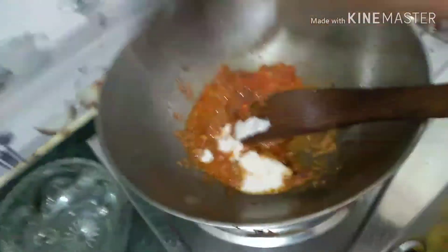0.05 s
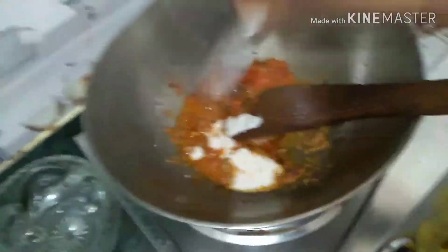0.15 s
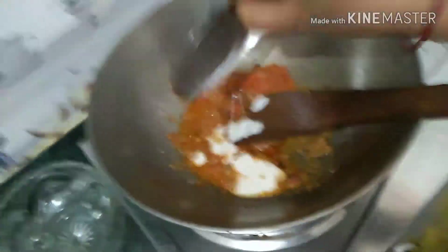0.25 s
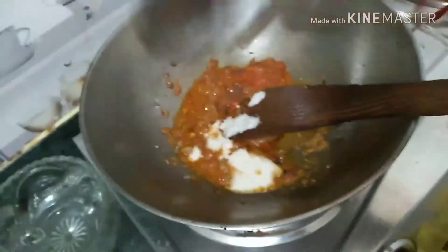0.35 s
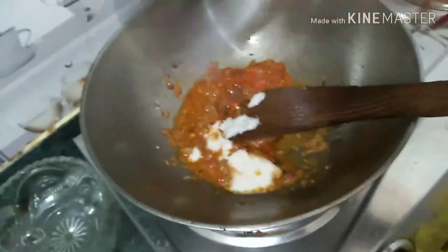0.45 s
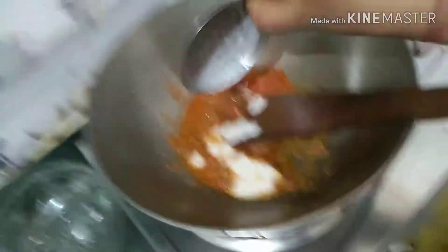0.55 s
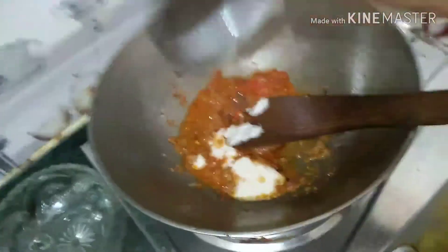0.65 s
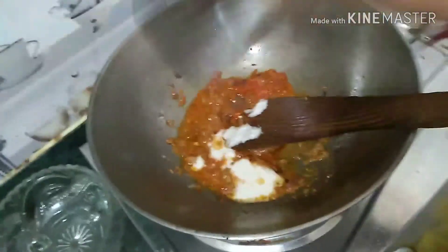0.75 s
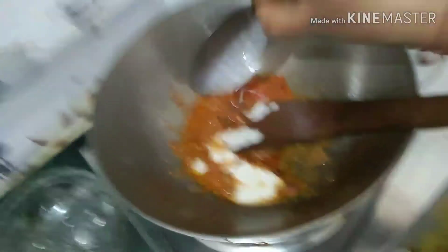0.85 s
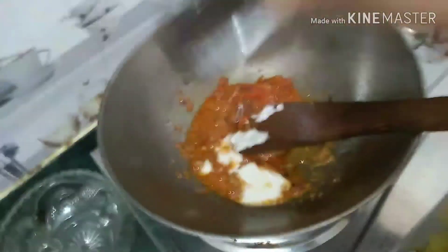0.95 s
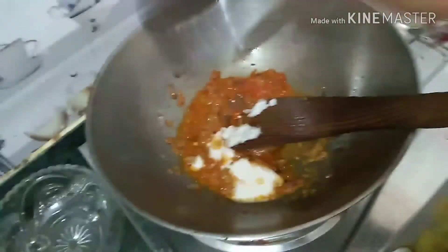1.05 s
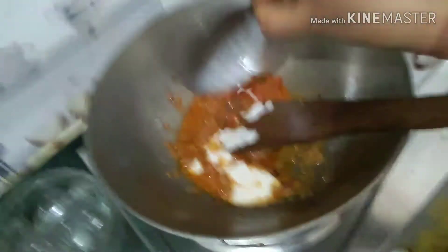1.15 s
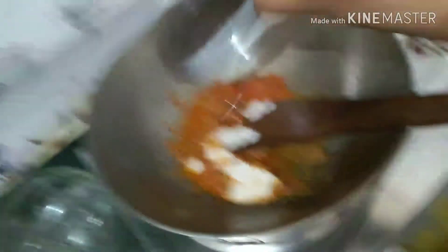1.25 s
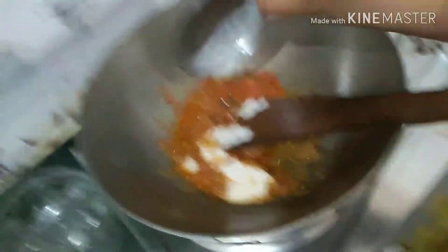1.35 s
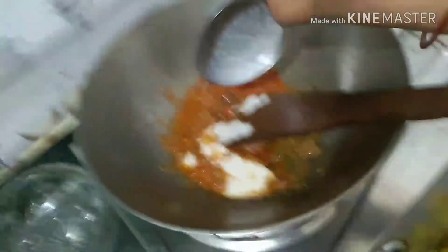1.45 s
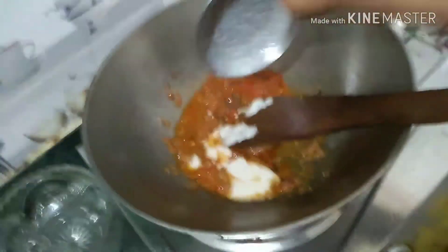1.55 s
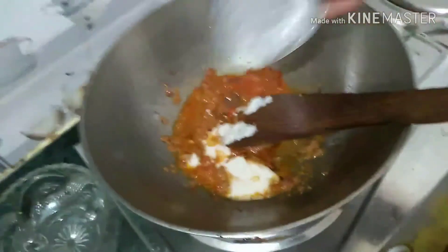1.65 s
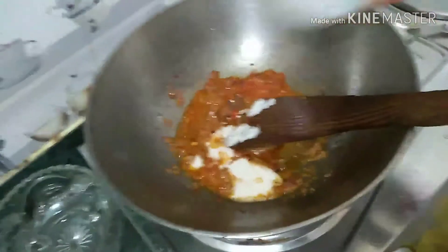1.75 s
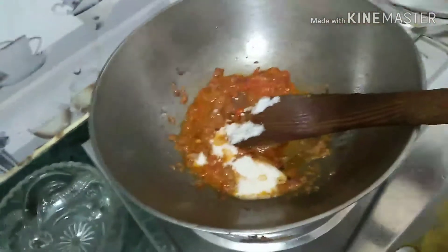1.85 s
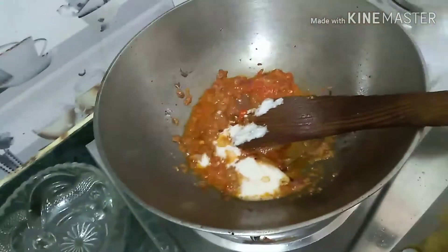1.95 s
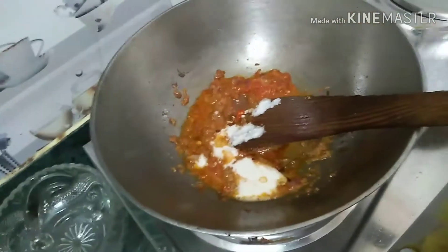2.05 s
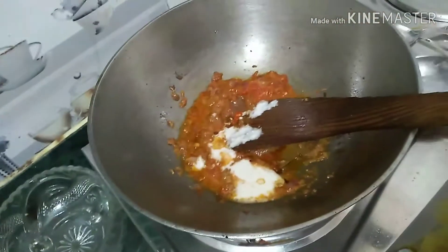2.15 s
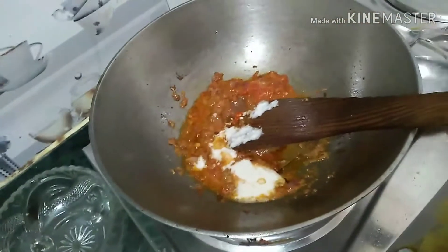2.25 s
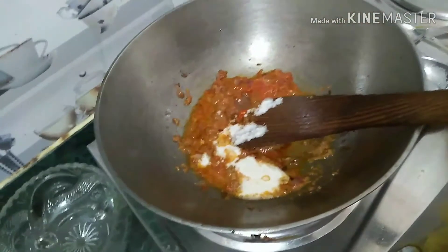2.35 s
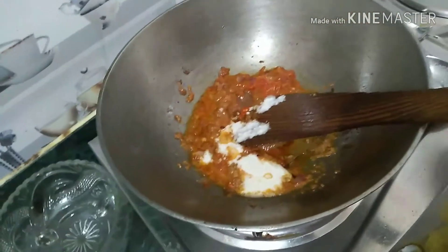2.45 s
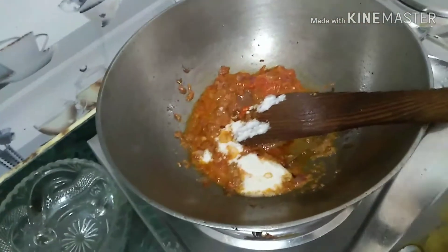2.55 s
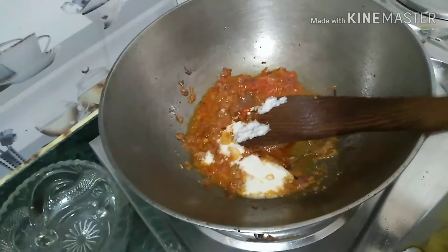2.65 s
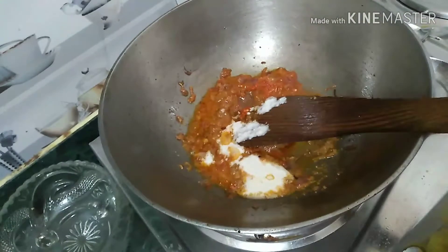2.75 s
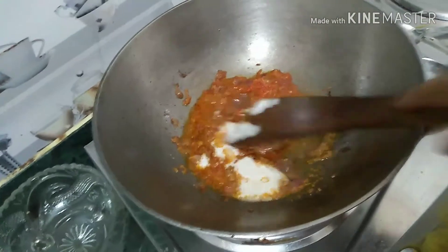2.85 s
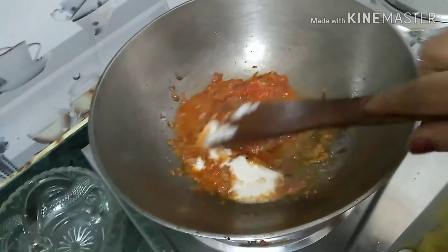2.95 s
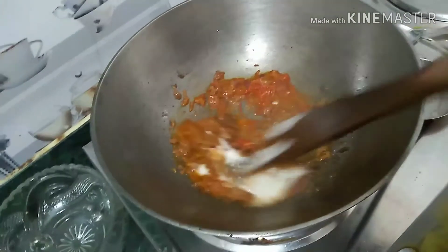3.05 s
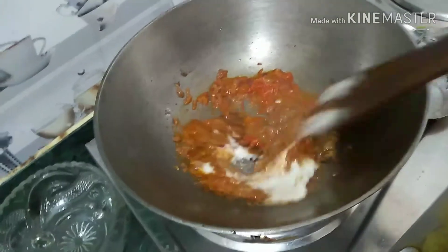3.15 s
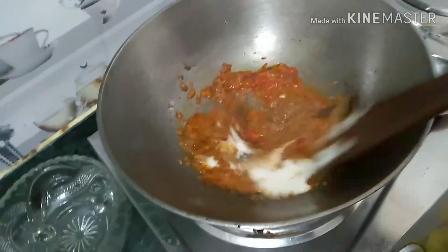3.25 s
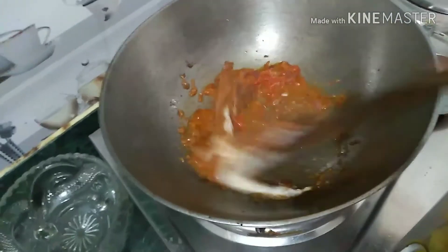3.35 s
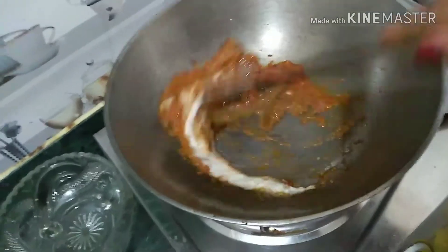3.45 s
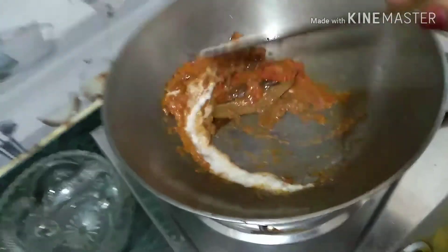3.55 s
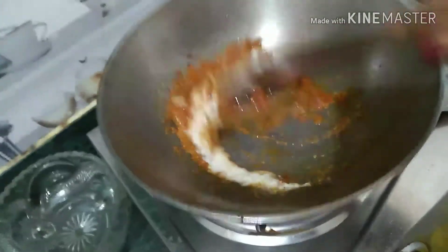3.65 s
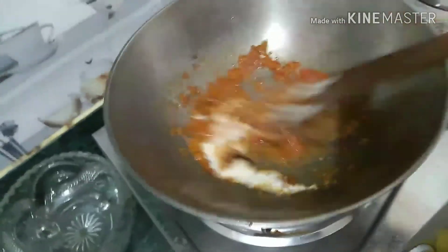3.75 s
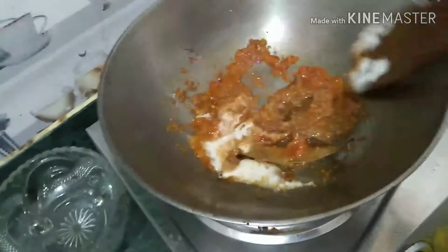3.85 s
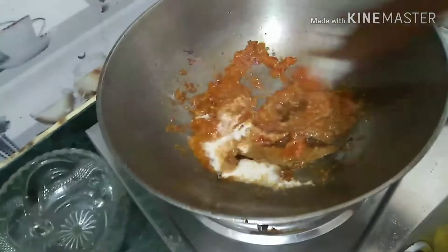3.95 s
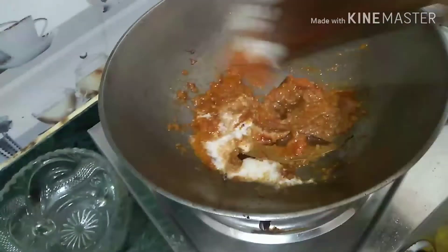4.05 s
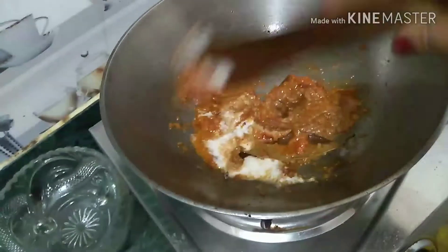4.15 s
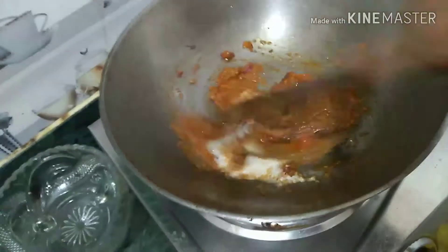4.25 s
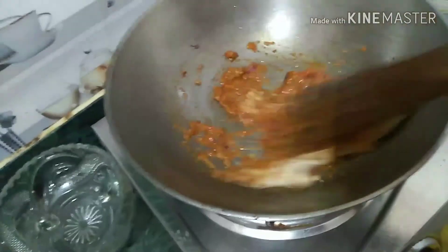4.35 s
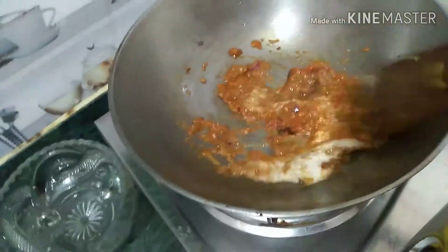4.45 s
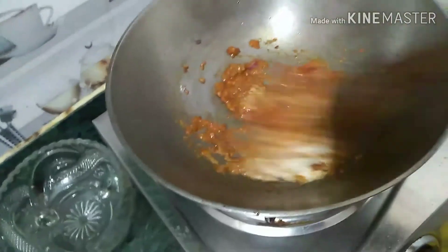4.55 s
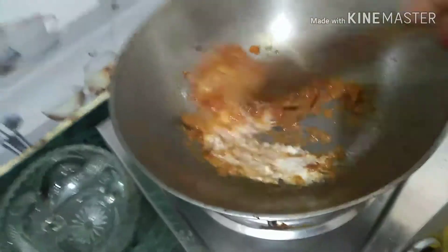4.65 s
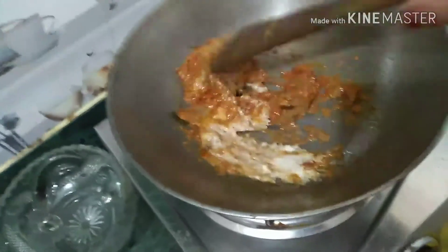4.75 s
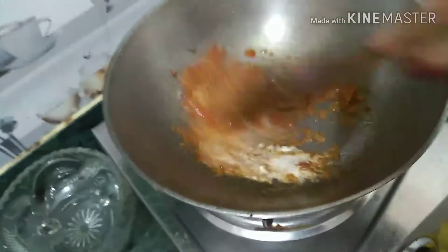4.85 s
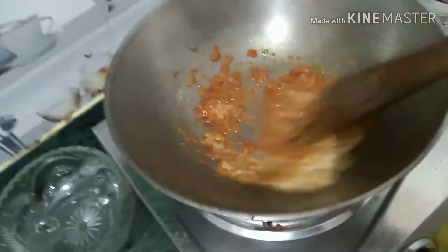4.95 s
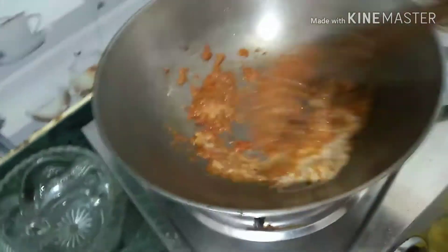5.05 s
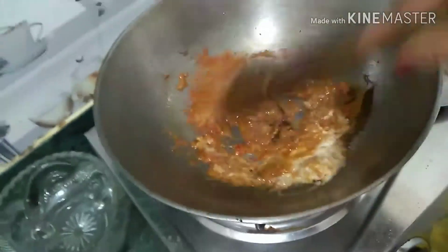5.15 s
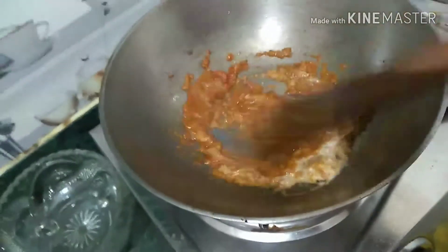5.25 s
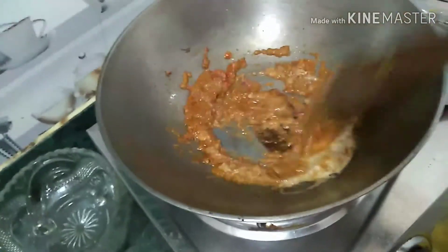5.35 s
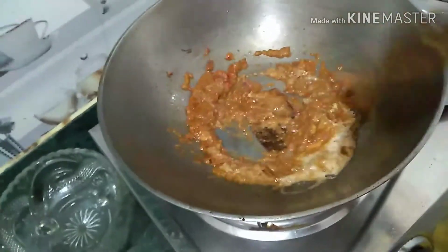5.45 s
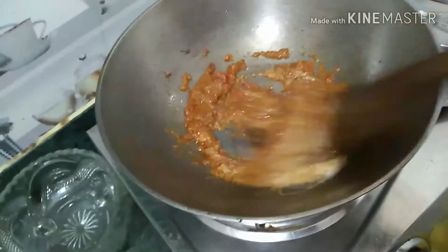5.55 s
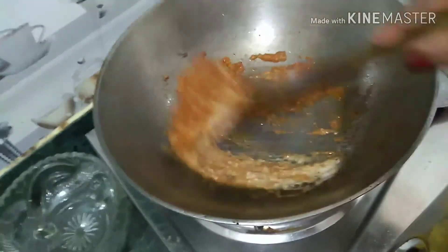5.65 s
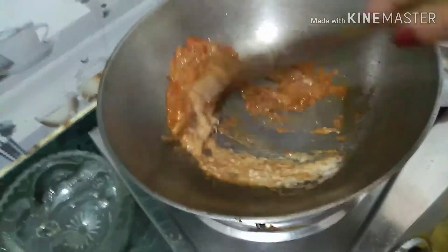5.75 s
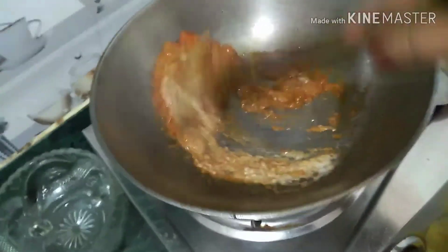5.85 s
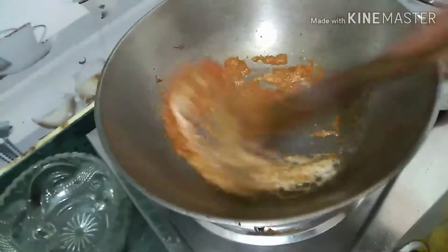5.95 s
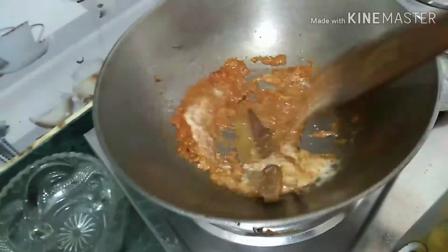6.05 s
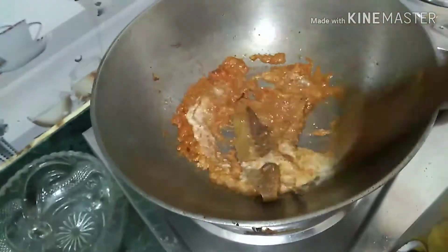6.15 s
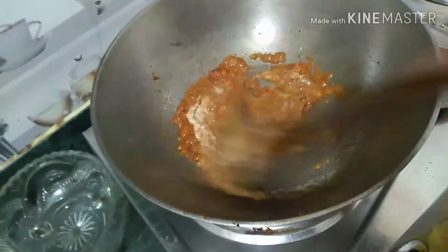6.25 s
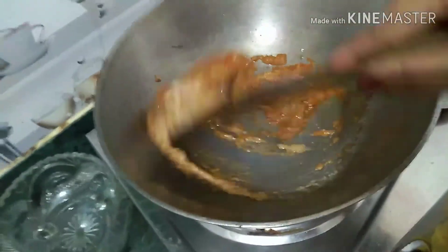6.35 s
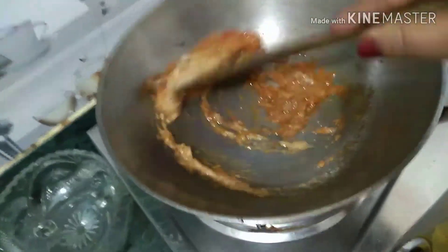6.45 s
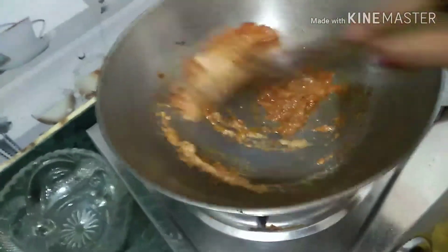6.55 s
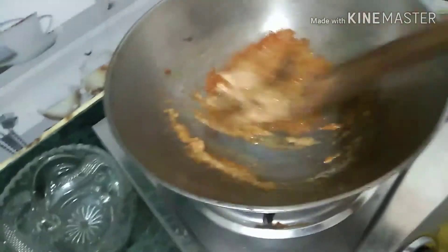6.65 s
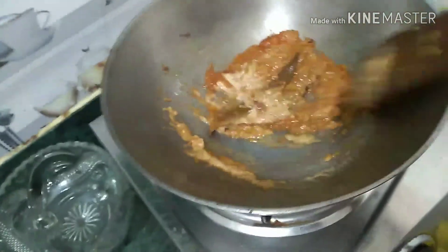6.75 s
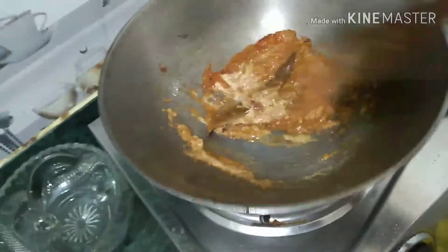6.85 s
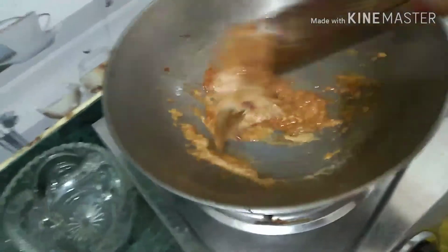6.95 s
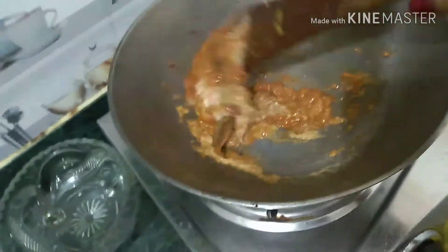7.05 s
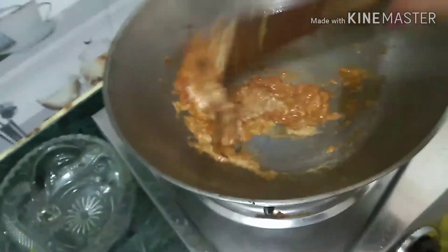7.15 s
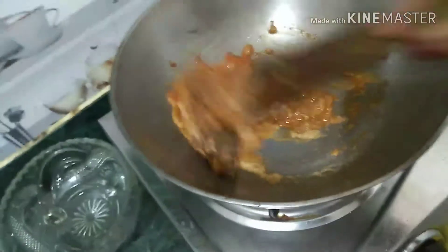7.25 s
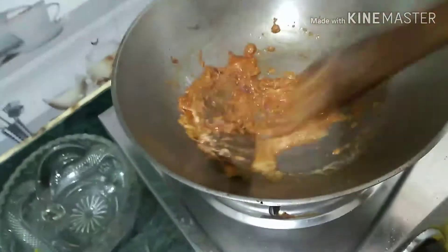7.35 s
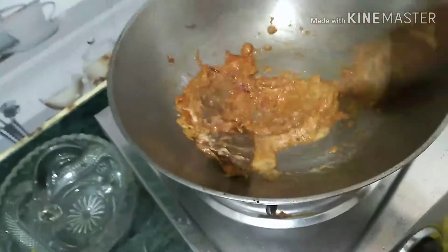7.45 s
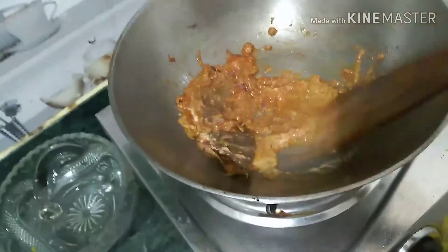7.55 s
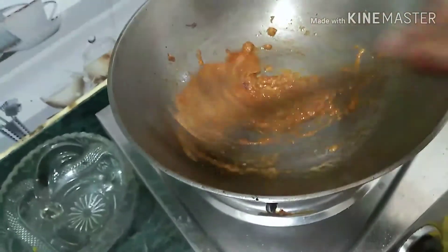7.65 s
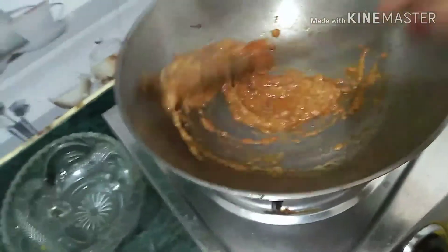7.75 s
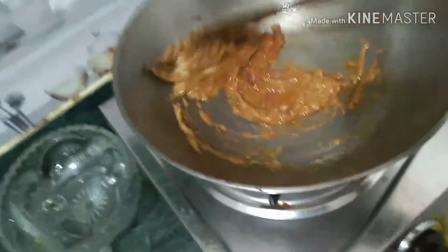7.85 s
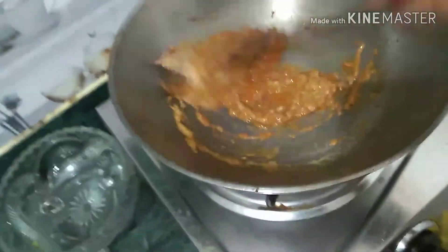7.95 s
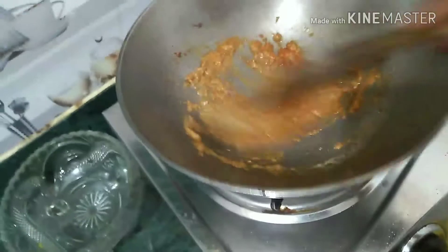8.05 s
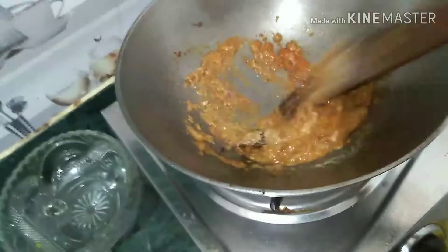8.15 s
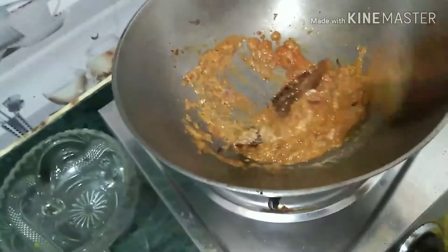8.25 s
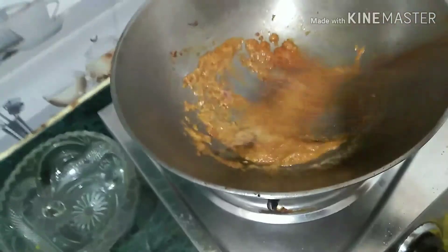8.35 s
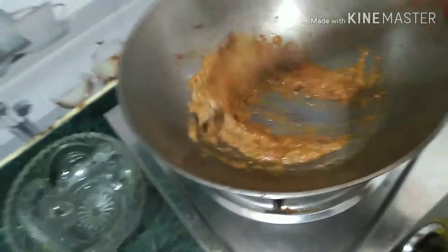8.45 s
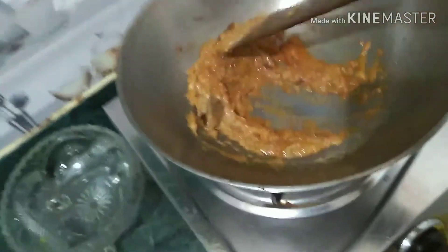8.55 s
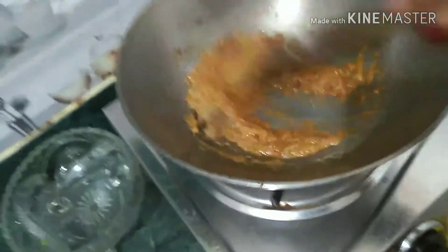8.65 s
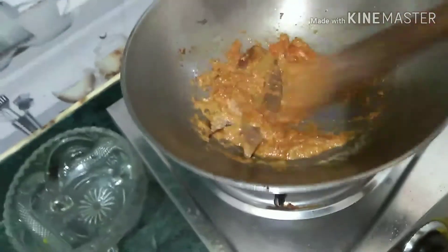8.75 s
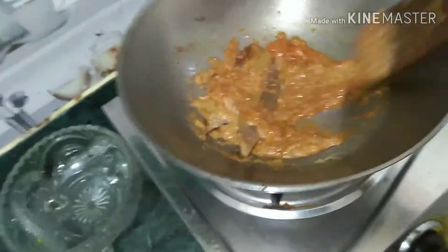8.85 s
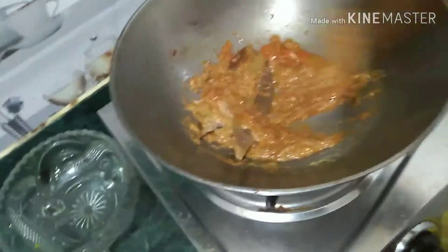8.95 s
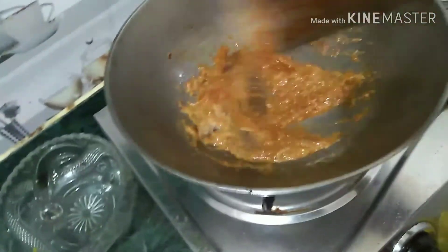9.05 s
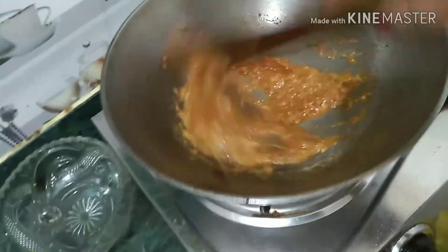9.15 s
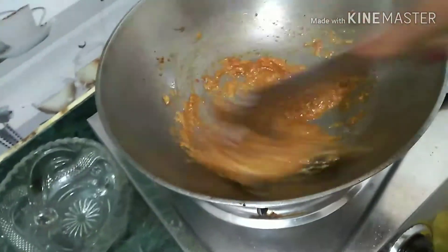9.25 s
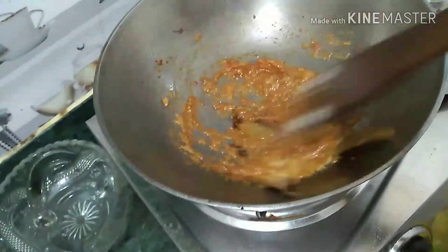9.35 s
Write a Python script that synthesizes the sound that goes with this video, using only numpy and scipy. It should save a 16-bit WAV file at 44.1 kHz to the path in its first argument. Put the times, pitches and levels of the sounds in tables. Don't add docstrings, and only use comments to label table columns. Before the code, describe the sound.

In a home kitchen, close up, thick paste fries with a steady bright hiss and tiny crackling spits. Around two seconds a small metal bowl is set down with a sharp, loud knock and a softer bounce. From three seconds a wooden spatula rubs and taps the pan in strokes, and the sizzle flares with each sweep. Faint room hum and dull microphone handling bumps lie beneath.

```python
import sys
import numpy as np
from scipy import signal
from scipy.fft import rfft, irfft, next_fast_len
from scipy.io import wavfile
from scipy.ndimage import uniform_filter1d

SR = 44100
rng = np.random.default_rng(int(sys.argv[2]) if len(sys.argv) > 2 else 0)


def field_ratio(decibels):
    return 10 ** (np.asarray(decibels, dtype=float) / 20)


def output_pcm(signal):
    pcm = np.clip(np.atleast_2d(signal).T, -1, 1) * 32767
    wavfile.write(sys.argv[1], SR, np.round(pcm).astype(np.int16))


N = 414981


def rms_one(x):
    return x / np.sqrt(np.mean(x ** 2) + 1e-20)


def at_hz(points, hz):
    table_hz, value = np.transpose(points)
    return np.interp(np.log(hz), np.log(table_hz), value)


def band_filter(x, low_hz, high_hz):
    return signal.sosfilt(signal.butter(2, [low_hz, high_hz], "band", fs=SR, output="sos"), x)


def high_pass(x, order, hz):
    return signal.sosfilt(signal.butter(order, hz, "high", fs=SR, output="sos"), x)


def drift(rate_hz):
    step, warmup = 40, 2000
    r = np.exp(-2 * step * np.pi * rate_hz / SR)
    white = rng.standard_normal(N // step + warmup + 2)
    slow = rms_one(signal.lfilter([1], [1, -2 * r, r * r], white)[warmup:])
    return np.interp(np.arange(N) / step, np.arange(len(slow)), slow)


def swell(start_s, rise_s, hold_s, fall_s):
    corners_s = np.cumsum([start_s, rise_s, hold_s, fall_s])
    return np.interp(np.arange(N) / SR, corners_s, [0, 1, 1, 0])


def clicks_at(times_s, sizes):
    out = np.full(N, 1e-18)
    out[(np.asarray(times_s) * SR).astype(int)] = sizes
    return out


def grains(per_s, spread_db):
    happens = rng.random(N) < per_s / SR
    size_db = spread_db * np.minimum(rng.exponential(1, N), 5)
    return happens * field_ratio(size_db) + 1e-18


def die(clicks, t60_s):
    return signal.lfilter([1], [1, -field_ratio(-60 / (t60_s * SR))], clicks)


def ring(clicks, hz, t60_s):
    r = field_ratio(-60 / (t60_s * SR))
    w = 2 * np.pi * hz / SR
    return signal.lfilter([0, np.sin(w)], [1, -2 * r * np.cos(w), r * r], clicks)


def bands(low_hz, high_hz, envelope):
    count = round(3 * np.log2(high_hz / low_hz))
    edges = np.geomspace(low_hz, high_hz, count + 1)
    white = rng.standard_normal((2, len(envelope))) * envelope
    for k, (low, high) in enumerate(zip(edges, edges[1:])):
        yield np.sqrt(low * high), band_filter(white[k % 2], low, high)


# f/Hz, density/dB per Hz
ROOM_COLOUR = [(18, -55), (30, -19), (98, 1.5), (252, -5.5), (282, -5), (310, -2), (374, -4), (459, -8.5),
               (521, -0.5), (703, -2.5), (760, -8.5), (1030, -4), (1300, -22), (1690, -31), (2860, -120)]
ROOM_DB, ROOM_WAVER_DB = -59.5, -0.25
ECHO_DB, ECHO_T60_S = -53.5, 3.9


def room_tone():
    hum = sum(field_ratio(at_hz(ROOM_COLOUR, hz) + 2.4 * drift(6.9)) * band
              for hz, band in bands(45, 1283, np.ones(N)))
    last_knock_s = KNOCKS[-1][0]
    echo = die(clicks_at([last_knock_s], field_ratio(ECHO_DB)), ECHO_T60_S)
    steady = field_ratio(ROOM_DB + ROOM_WAVER_DB * drift(4.5))
    return np.hypot(steady, echo) * rms_one(hum)


# t/s, half length/s, level/dB
THUMPS = [(0.196, 0.11, -52), (.84, .1, -70), (1.38, .2, -60), (1.548, 0.18, -48.5), (1.728, 0.056, -40),
          (1.862, .06, -63), (3.543, 0.1, -63), (5.098, .12, -67), (5.29, 0.11, -49.5), (5.496, .12, -59),
          (5.827, .07, -55), (6.6, .6, -62), (7.158, 0.12, -47.5), (8.3, .4, -64), (9.2, 0.18, -53)]
GRIP_DB, GRIP_WAVER_DB, THUMP_RANGE_DB = -76.5, 3, 29.5


def handling():
    low = band_filter(rng.standard_normal(N), 48, 100)
    level = field_ratio(GRIP_DB + GRIP_WAVER_DB * drift(8.8))
    for s, half_s, db in THUMPS:
        shape = swell(s - half_s, half_s, 0.0093, half_s)
        gate = swell(s - half_s, .01, 2 * half_s, .01)
        level = level + field_ratio(db - THUMP_RANGE_DB * (1 - shape)) * gate
    return level * rms_one(low)


# t/s, peak level/dB, tilt/dB per octave, rise/s, crack size
KNOCKS = [
    (2.1955, -8.5, -0.9, 0.00071, 1.7),
    (2.3156, -17, -3, 0.0049, 0.1),
]
# f/Hz, density/dB per Hz
KNOCK_COLOUR = [(71, -51), (120, -59), (189, -6), (782, 2.5), (1900, -3), (3980, -1), (4700, -3),
                (6530, -5.5), (10100, 1), (15200, -10), (16500, -40)]
# f/Hz, t60/s
KNOCK_T60 = [(150, 0.33), (500, 0.38), (2000, 0.49), (6000, 0.3), (15000, 0.15)]
# f/Hz, level/dB, t60/s
BOWL = [(510, -9, 0.25), (590, -18, 0.41), (753, 4, 0.31), (1137, 6, 0.12), (1540, -2, 0.33),
        (1805, -3, 0.52), (2263, -6, 0.14), (2410, -11, 0.32), (2580, -1, 0.41), (3047, -2, 0.44),
        (3320, -18, 0.13), (3240, -13, 5.0),
        (251, -19, 0.22), (397, -1.5, 0.21), (850, -3, 0.091)]


def bowl():
    out, length = np.zeros(N), round(.6 * SR)
    t = np.arange(length) / SR
    impulse = 1. * (t == 0)
    for s, peak_db, tilt_db, rise_s, crack in KNOCKS:
        tail = 0
        for hz, band in bands(132, 14650, np.ones(length)):
            t60_s = at_hz(KNOCK_T60, hz)
            decay = field_ratio(-60 * t / t60_s) + 1.6 * field_ratio(-60 * t / min(.06, t60_s / 3))
            tail = tail + field_ratio(at_hz(KNOCK_COLOUR, hz) + tilt_db * np.log2(hz / 1000)) * band * decay
        body = sum(field_ratio(db + 2.0 * rng.standard_normal()) * ring(impulse, hz, min(t60_s, .24))
                   for hz, db, t60_s in BOWL)
        snap = crack * (np.arange(length) == round(rise_s * SR))
        hit = tail / np.abs(tail).max() + field_ratio(-22.5) * body - snap
        onset = np.minimum(t / rise_s + 0.08, 1)
        at = round(s * SR)
        out[at:at + length] += field_ratio(peak_db + 0.5) * hit * onset
    return out


# t/s, hold/s, release/s, level/dB
STROKES = [(3.097, 0.018, .1, -77), (3.54, .06, .1, -59), (3.666, 0.051, 0.39, -36.5),
           (4.219, 0.026, 0.26, -43), (4.955, 0.12, 0.17, -45.5), (5.2, .02, 0.37, -53),
           (5.485, .02, 0.48, -53), (5.887, 0.047, 0.17, -44.5), (5.956, .02, 0.75, -44.5),
           (6.17, 0.014, .15, -62), (6.55, 0.038, 0.32, -37), (6.774, .01, .08, -58),
           (6.885, .1, 0.52, -47.5), (7.565, .01, 0.12, -63), (8.017, 0.092, 0.48, -37),
           (8.31, 0.0088, 0.21, -51), (8.683, 0.095, 0.29, -42), (8.94, .02, .3, -54.5),
           (9.073, .03, 0.19, -47.5), (9.19, 0.021, 0.28, -53)]
BITE_S, STROKE_RANGE_DB = 0.025, 37.5
# f/Hz, density/dB per Hz
RUB_COLOUR = [(65, -51), (110, -9.5), (250, -2), (337, -15), (379, -6), (530, -3.5), (741, 1), (1020, -7.5),
              (1130, -13), (4750, -12), (6000, -5), (7800, -40), (13200, -120)]
# f/Hz, level/dB, t60/s
PAN = [(190, -8.5, 0.41), (255.8, 0, 0.18), (314.7, -2, 0.22), (387.4, 1.5, 0.2), (460.4, -1.5, 0.12),
       (567, -0.5, 0.05), (650, -21, 0.05), (735, -2, 0.35), (850, -7, 0.12), (1143, -19, 0.36),
       (1324, 1, 0.097), (1515, 2, 0.095), (1844, -9, 0.45), (2340, -2, 0.15)]
# t/s, peak level/dB, brightness/dB
TAPS = [(3.677, -35, 8.5), (4.242, -38.5, 6), (4.968, -41.5, 12), (5.492, -40.5, 2), (5.9, -39, 11),
        (5.964, -37, 6), (6.545, -33.5, 6.5), (6.904, -42, 10), (7.982, -40, -11), (8.018, -28, -1),
        (8.053, -29.5, -1), (8.099, -32, 1.5), (8.69, -40.5, 9.5), (8.775, -29, -0.5), (8.899, -39, -13),
        (9.083, -44, 5), (9.274, -42, 5.5)]
# t/s, f/Hz, level/dB, t60/s
RIM = [
    (5.492, 1841, -43, 1.0),
    (5.5, 188, -58, 2.5),
    (3.9, 190, -60, 1.5),
]


def spatula():
    times, peak_db, bright_db = np.transpose(TAPS)
    rub = die(clicks_at(times, field_ratio(peak_db - 21)), 0.13)
    for s, hold_s, release_s, db in STROKES:
        shape = swell(s, BITE_S, hold_s, release_s)
        rub = rub + field_ratio(db - STROKE_RANGE_DB * (1 - shape)) * (shape > 0)
    slips = grains(900 * field_ratio(2.0 * drift(20)), spread_db=2.2)
    rung = sum(field_ratio(db) * ring(slips * rng.standard_normal(N), hz, t60_s) for hz, db, t60_s in PAN)
    grit = sum(field_ratio(at_hz(RUB_COLOUR, hz)) * band for hz, band in bands(106.0, 6000, die(slips, 0.021)))
    humming = field_ratio(-66.5)
    out = (field_ratio(-7.0) * rub + humming) * rms_one(rung) + field_ratio(-3) * rub * rms_one(grit)

    luck_db = rng.normal(0, 2.5, (len(TAPS), len(PAN)))
    for (hz, db, t60_s), own_db in zip(PAN, luck_db.T):
        strength = field_ratio(peak_db + db - 14.5 + own_db)
        out += ring(clicks_at(times, strength), hz, 0.97 * t60_s)
    contact = die(clicks_at(times, field_ratio(peak_db + bright_db + 3.5)), 0.059) * rng.standard_normal(N)
    out += band_filter(contact, 1200, 3200)
    out = high_pass(out, 3, 130)
    for s, hz, db, t60_s in RIM:
        out += ring(clicks_at([s], field_ratio(db)), hz, t60_s)
    return out


def bursting(big, surge, spray):
    small = rms_one(grains(400 * field_ratio(2.2 * drift(12)), spread_db=3.0))
    puffs = spray * rms_one(die(small, 0.0043)) + 0.042 * die(big, 0.0036) + surge
    hiss = np.hypot(field_ratio(0.61 * drift(14)), puffs) * rng.standard_normal(N)
    pops = 0.082 * small * rng.choice([-1, 1], N)
    return rms_one(hiss + pops) - big


# f/Hz, density/dB per Hz
FRY_COLOUR = [(650, -52), (1100, -20.5), (2000, -14), (2390, -15), (2790, -17), (4310, -13), (5560, -14.5),
              (9470, -2), (14900, -14.5), (15600, -15)]
# t/s, spit level/dB
HEAT = [(0, -40), (.55, -39), (1.1, -39.5), (2.1, -41), (2.8, -40.5), (3.3, -39), (3.8, -35.5), (4.0, -33),
        (4.6, -35.5), (5.0, -34.5), (5.6, -38), (6.28, -39.5), (7.1, -34), (7.55, -39), (8.7, -39.5),
        (8.885, -41.5), (9.05, -37), (9.41, -38.5)]
# t/s, rise/s, hold/s, fall/s, gain/dB
SWEEPS = [
    (3.403, 0.16, .03, .22, 7),
    (4.636, .12, 0.052, 0.11, 4.5),
    (5.654, 0.097, 0.12, 0.39, 6.5),
    (6.313, 0.094, 0.18, 0.15, 6.5),
    (6.935, 0.072, 0.027, 0.093, 4),
    (7.637, .17, .12, .3, 4.5),
]
# t/s, peak level/dB
SPITS = [(0.2906, -22.2), (0.3362, -19.6), (0.7422, -21.4), (0.7584, -19.3), (1.0855, -21.5),
         (1.4871, -20.9), (1.5344, -20.9), (1.9765, -21.3), (2.0129, -19.4), (3.083, -20.9),
         (3.2465, -19.3), (3.5436, -11.7), (4.8325, -15.2), (4.8858, -16.4), (5.7988, -13.4),
         (6.253, -19.6), (7.1612, -17.3), (7.4079, -18.2), (7.4625, -18.5), (7.7882, -15.9),
         (7.8341, -15.3), (7.88, -15.8), (7.9597, -16.0), (8.5792, -20.2), (8.8996, -21), (8.9708, -17.8),
         (9.015, -19.9), (9.0242, -19.1), (9.032, -18.3), (9.3337, -18.3)]
# t/s, peak level/dB
SPRAYS = [(3.4855, -34), (3.7026, -18), (4.672, -25), (4.76, -27), (5.7194, -20), (5.9624, -25),
          (6.9705, -22), (8.0162, -18), (8.049, -16.5), (8.098, -20), (8.899, -26.5)]
SPITS_PER_S, SPIT_CREST_DB = 3, 17.5
FLUTTER_DB, FLUTTER_HZ = .5, 10.3
LOWER_DB, LOWER_LAGS, LOWER_FLUTTER_DB = -11.5, 0.31, 0.5
TURN_DB, TURN_S = 2, 0.053


def frying():
    heat_s, heat_db = np.transpose(HEAT)
    spit_db = np.interp(np.arange(N) / SR, heat_s, heat_db)
    spit_db = spit_db + sum(db * swell(*shape) for *shape, db in SWEEPS)
    lower_db = LOWER_DB - LOWER_LAGS * (spit_db + 39.5) + LOWER_FLUTTER_DB * drift(4.2)
    lower_db += TURN_DB * sum(swell(s, 0.0048, 0.01, TURN_S) for s, _ in SPRAYS)
    spit_db = spit_db + FLUTTER_DB * drift(FLUTTER_HZ)

    times, peak_db = np.transpose(SPITS)
    big = clicks_at(times, field_ratio(peak_db)) / field_ratio(spit_db)
    big = big + field_ratio(SPIT_CREST_DB) * grains(SPITS_PER_S, spread_db=.7)
    times, peak_db = np.transpose(SPRAYS)
    surge = die(clicks_at(times, field_ratio(peak_db - 12)), 0.11) / field_ratio(spit_db)

    size = next_fast_len(N)
    hz = np.maximum(np.arange(size // 2 + 1) * SR / size, 1)
    colour = field_ratio(at_hz(FRY_COLOUR, hz)) * (hz < 15560)
    large = np.clip(np.log2(6500 / hz) / 0.93, 0, 1)
    tiny = np.clip(np.log2(hz / 8000) / 0.86, 0, 1)

    def pockets(share, spray):
        spectrum = rfft(bursting(big, surge, spray), size)
        return irfft(spectrum * colour * np.sqrt(share), size)[:N]

    lower = pockets(large, .35)
    bright = pockets(1 - large - tiny, .55) + pockets(tiny, .65)
    out = bright + field_ratio(lower_db + 12.5) * lower
    return field_ratio(spit_db + 2.5) * out / bright.std()


def scene():
    mono = frying() + spatula() + bowl() + handling() + room_tone()
    return np.array([mono, mono])


# f/Hz, share
SUPPRESSION = [(100, 0.65), (400, 0.16), (1000, 0.06), (3000, 0.14), (8000, 0.087), (16000, 0.13)]
# t/s, half length/s, f/Hz, depth/dB
DROPOUTS = [(0.048, 0.095, 850, 4), (0.76, 0.12, 960, 10), (1.28, .1, 920, 14), (1.73, 0.097, 920, 50),
            (1.92, .04, 1020, 7), (3.078, .073, 815, 20), (4.65, 0.057, 915, 12), (5.43, .045, 910, 22),
            (6.39, 0.087, 940, 18), (7.5, .15, 900, 13), (7.55, 0.13, 1720, 11), (8.61, 0.11, 1020, 27),
            (9.356, 0.04, 1060, 21), (.6, 0.69, 2970, 3), (2.85, 0.28, 2820, 2), (.4, 0.18, 296, 14),
            (1.13, 0.11, 277, 15), (2.074, 0.13, 260, 12), (3.555, 0.15, 258, 1), (7.643, 0.3, 340, 10.5),
            (7.922, 0.04, 390, 12)]
# f/Hz, half width/octaves
DROPOUT_WIDTH = [(300, 0.79), (800, 0.15), (1000, 0.27), (2900, 0.11)]


def suppressor(x):
    hz, s, cells = signal.stft(x, SR, nperseg=1024, noverlap=768)
    power = uniform_filter1d(np.abs(cells) ** 2, size=3, axis=1) + 1e-20
    steady = uniform_filter1d(np.median(power, axis=1), size=9)
    steady = steady * np.clip(at_hz(SUPPRESSION, hz + 1), 0, 1)
    gain = np.sqrt(np.maximum(1 - steady[:, None] / power, .06))
    for at, half_s, centre_hz, depth_db in DROPOUTS:
        half_oct = at_hz(DROPOUT_WIDTH, centre_hz)
        near_hz = np.exp(-(np.log2((hz[:80] + 1) / centre_hz) / half_oct) ** 4)
        near_s = np.exp(-((s - at) / half_s) ** 4)
        gain[:80] *= 1 - (1 - field_ratio(-depth_db)) * np.outer(near_hz, near_s)
    return signal.istft(cells * gain, SR, nperseg=1024, noverlap=768)[1][:N]


def roll_off(x):
    return signal.sosfilt(signal.butter(12, 16810, fs=SR, output="sos"), x)


def record(dry):
    mono = suppressor(high_pass(dry[0], 2, 55))
    return roll_off(np.array([mono, mono]))


dry = scene()
out = record(dry)
output_pcm(out)
```